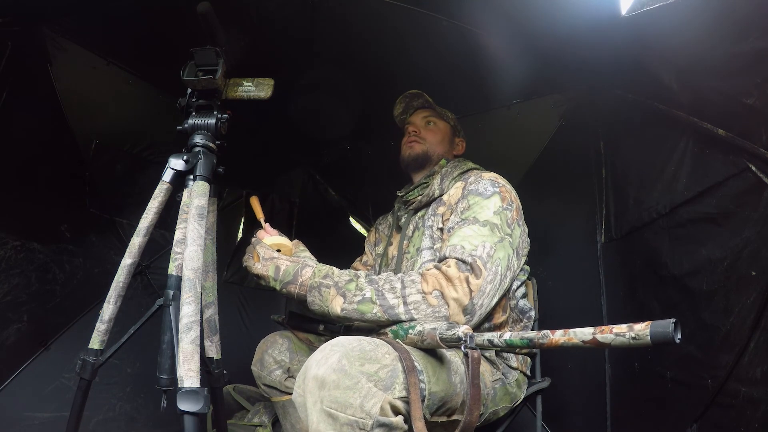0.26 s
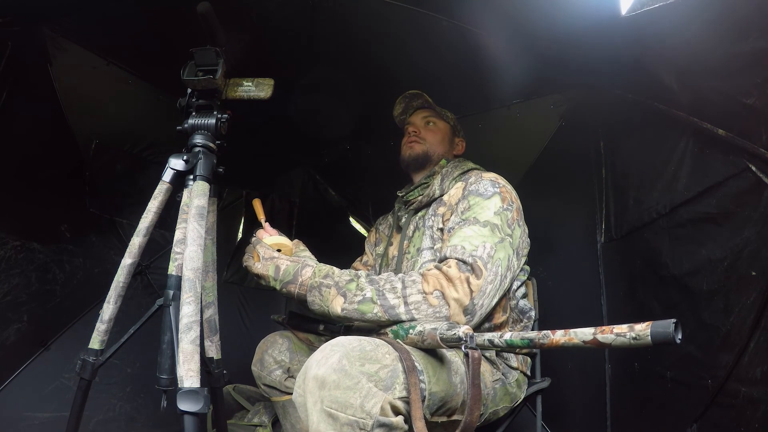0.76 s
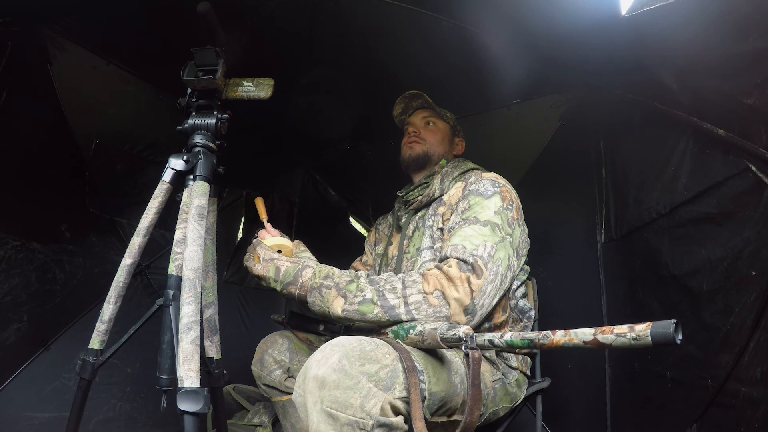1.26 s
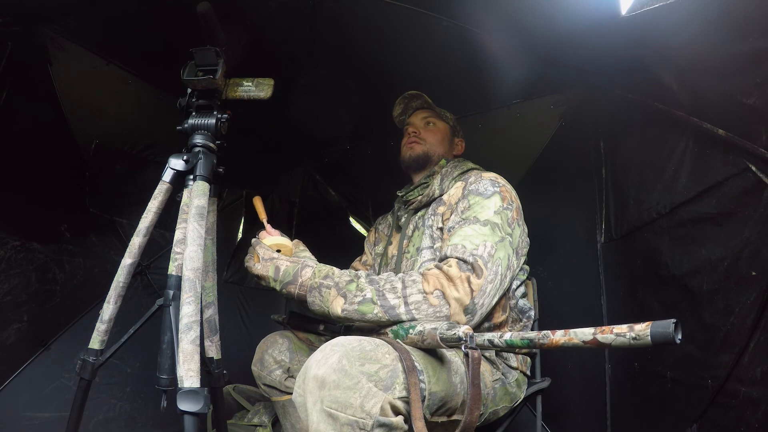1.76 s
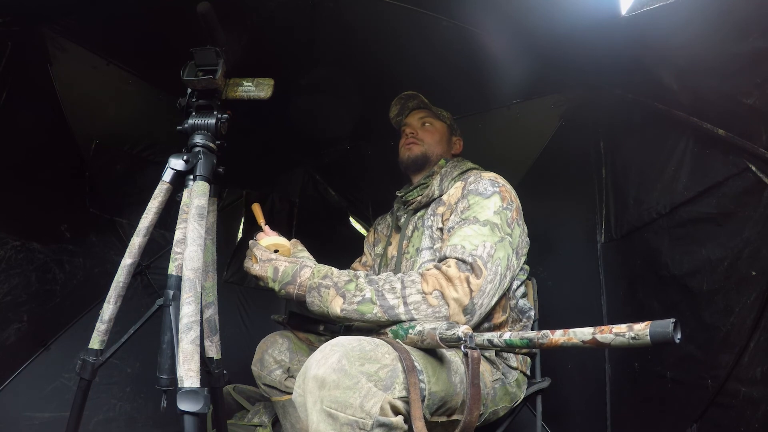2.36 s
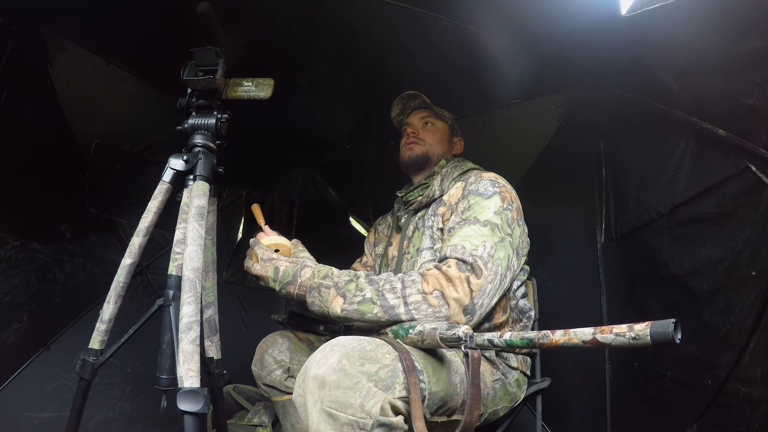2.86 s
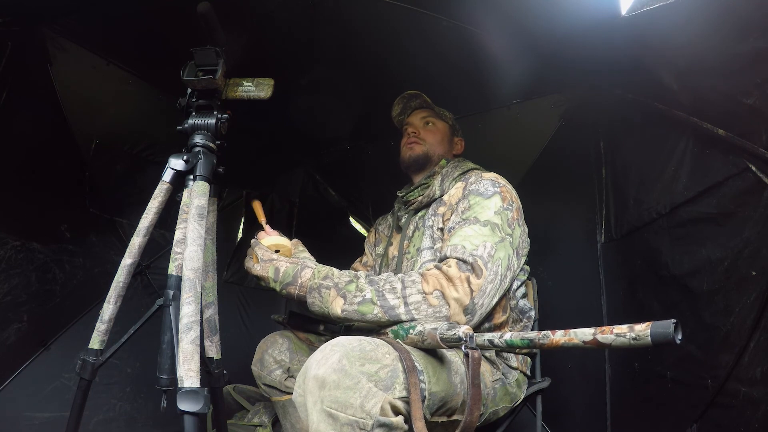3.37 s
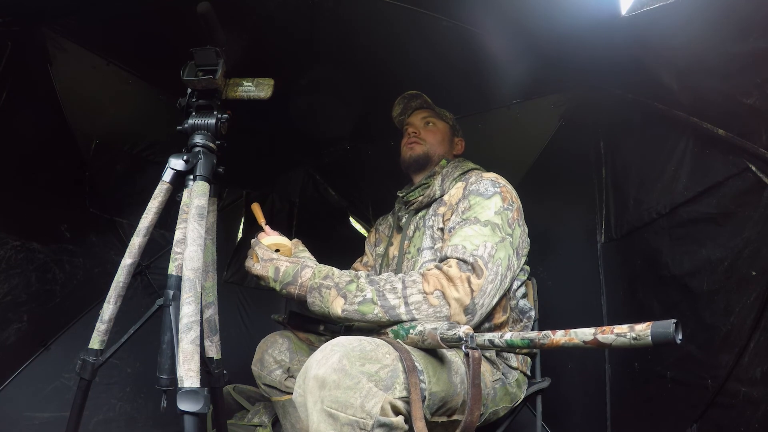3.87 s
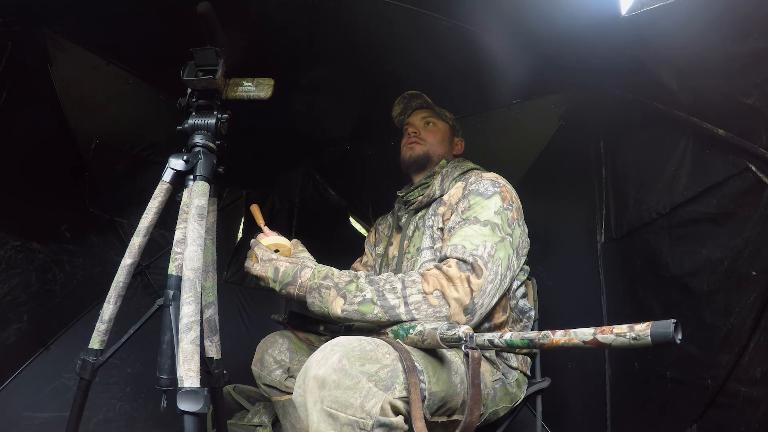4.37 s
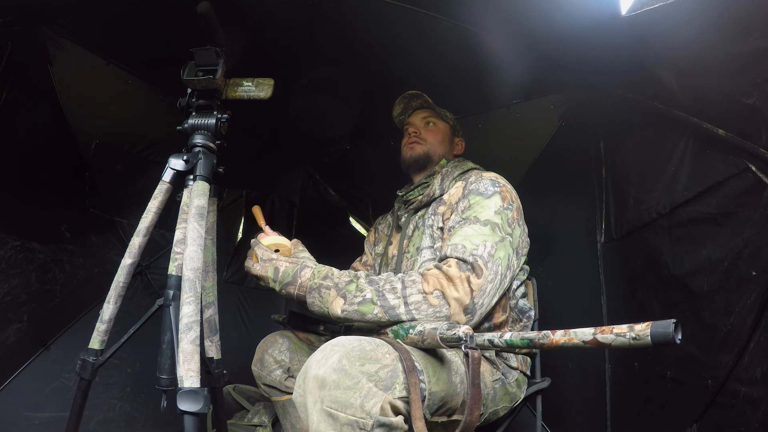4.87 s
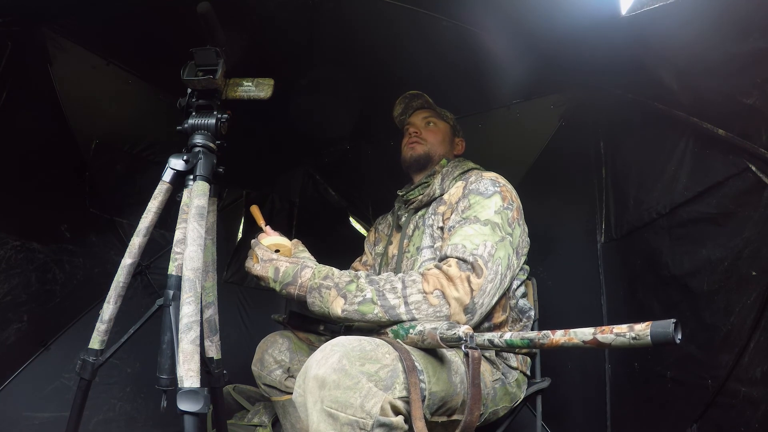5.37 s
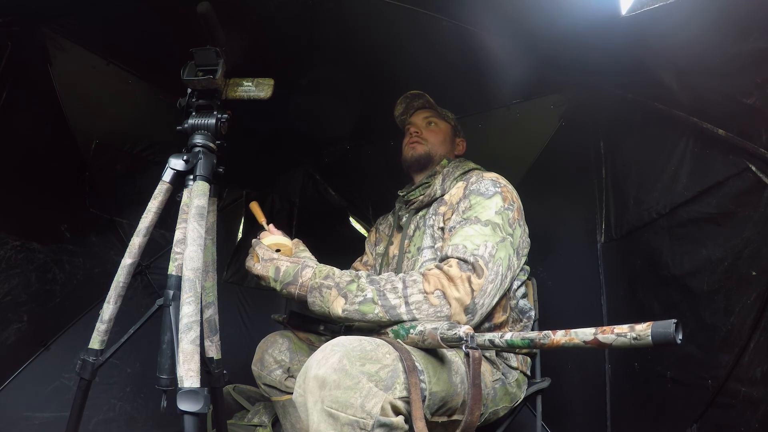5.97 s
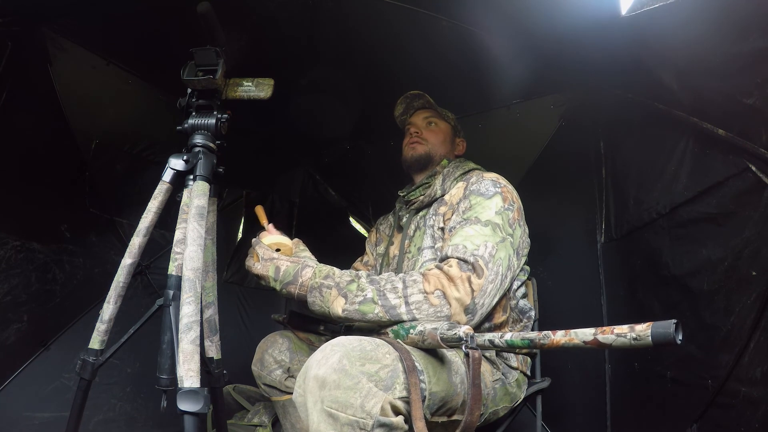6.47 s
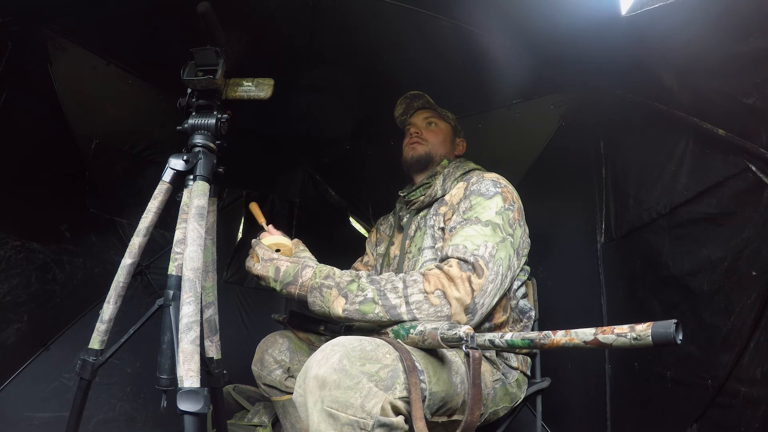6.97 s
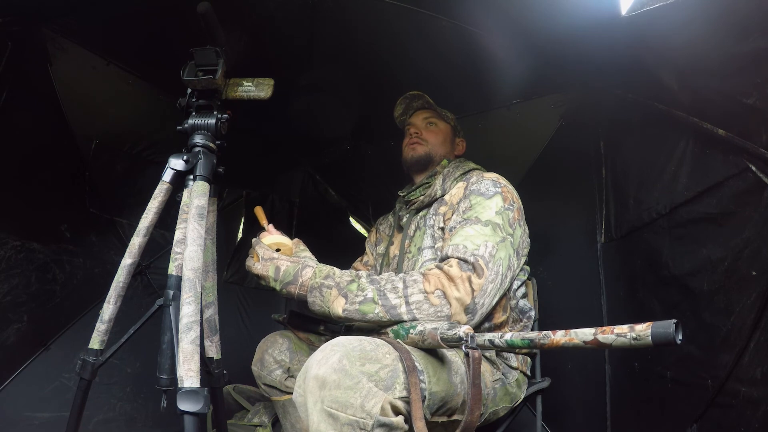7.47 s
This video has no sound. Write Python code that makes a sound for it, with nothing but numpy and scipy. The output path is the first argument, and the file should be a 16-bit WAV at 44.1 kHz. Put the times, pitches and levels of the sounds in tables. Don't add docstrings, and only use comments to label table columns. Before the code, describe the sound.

Hen turkey imitation scratched on slate: irregular hard clucks, a pause, then a steady run of nine cracking yelps over quiet low rumble and hiss.

```python
import sys
import numpy as np
from scipy import signal
from scipy.fft import rfft, irfft, next_fast_len
from scipy.io import wavfile
from scipy.ndimage import uniform_filter1d

SR = 44100
rng = np.random.default_rng(int(sys.argv[2]) if len(sys.argv) > 2 else 0)


def output_pcm(signal):
    pcm = np.clip(np.atleast_2d(signal).T, -1, 1) * 32767
    wavfile.write(sys.argv[1], SR, np.round(pcm).astype(np.int16))


def level_to_linear(level):
    exponent = np.asarray(level, float) / 20
    return 10 ** exponent


N = 340452

# start [t/s], length [t/s], pressure [level/dB], extra sharpness [dB per octave]
CLUCKS = [
    (0.155, 0.044, -11, 0),
    (0.925, .051, -10.5, 0),
    (1.272, 0.046, -10.5, -0.4),
    (1.653, 0.047, -9, -0.66),
    (3.365, .054, -10.5, -0.6),
    (4.536, .042, -15.5, -2.5),
]
# start [t/s], length [t/s], pressure [level/dB], break after start [t/s], pressure after the break [level/dB]
YELPS = [
    (4.848, 0.12, -27.5, 0.081, -17),
    (5.189, 0.11, -16.5, 0.035, -14),
    (5.504, .107, -16, .031, -12.5),
    (5.817, 0.11, -15, 0.05, -11),
    (6.140, 0.11, -11, .061, -13.5),
    (6.434, 0.12, -10.5, 0.064, -11),
    (6.775, .102, -12, .056, -13.5),
    (7.113, 0.11, -11.5, 0.062, -14),
    (7.437, 0.11, -12.5, 0.065, -13.5),
]


def evened(x):
    return x / np.sqrt(np.mean(x ** 2) + 1e-20)


def read(points, hz):
    f, value = np.transpose(points)
    return np.interp(np.log(hz + 1), np.log(f + 1), value)


def add(mix, s, sound):
    part = mix[round(s * SR):][:len(sound)]
    part += sound[:len(part)]


def coloured(x, points):
    n = x.shape[-1]
    size = next_fast_len(n)
    gain = level_to_linear(read(points, np.fft.rfftfreq(size, 1 / SR)))
    return irfft(rfft(x, size) * gain, size)[..., :n]


def air():
    # f/Hz, level/dB (per Hz)
    mid_colour = [(20, -18), (50, -19), (100, -22), (116, -22.5), (128, -6.5), (150, 3), (196, 0.6),
                  (278, -5.5), (500, -12.5), (1060, -16), (1860, -21), (5000, -27.5), (10000, -26.5),
                  (15000, -41.5)]
    # f/Hz, level/dB (per Hz)
    side_colour = [(20, -28.5), (106, -30), (125, -21), (146, 0), (237, -2.5), (278, -5), (572, -6),
                   (1060, -7), (1500, -14), (2070, -18.5), (3530, -32.5), (6500, -26.5), (10000, -29.5),
                   (15000, -37.5)]
    a, b, c, d, patches = rng.standard_normal((5, 513, N // 256 + 5))
    patches = uniform_filter1d(uniform_filter1d(patches, size=10, axis=0), size=16, axis=1)
    noise = np.array([a + 1j * b, c + 1j * d]) * level_to_linear(-0.54 * evened(patches))
    mid, side = signal.istft(noise, nperseg=1024, noverlap=768)[1][:, :N]
    mid = level_to_linear(-52.5) * evened(coloured(mid, mid_colour))
    side = level_to_linear(-49.5) * evened(coloured(side, side_colour))
    return np.array([mid + side, mid - side])


def tail(length, decay_db):
    taps = np.zeros((2, length))
    at = np.arange(100, length - 20, 20)
    at = at + rng.integers(0, 20, (2, len(at)))
    np.put_along_axis(taps, at, rng.choice([-1., 1.], at.shape), 1)
    hz, t, z = signal.stft(taps, SR, nperseg=256)
    out = signal.istft(z * level_to_linear(decay_db(hz[:, None], t)), SR, nperseg=256)[1]
    return out / np.linalg.norm(out[0])


def woods(x):
    # f/Hz, level/dB
    echo_colour = [(700, -48.5), (1000, -9.5), (1250, -3), (1450, -11.5), (1700, -10), (2500, -10.5),
                   (5000, -22.5), (9000, -23.5)]
    ring = [(1250, 1.5), (1500, .8), (2500, .5), (6000, .35)]  # f/Hz, decay by 60 dB t/s
    build_s, build_db = 0.087, 14

    def decay_db(hz, t):
        return -60 * t / read(ring, hz) - build_db * np.clip(1 - t / build_s, 0, 1)

    trees = tail(SR, decay_db)
    paths = trees[:1] + 0.36 * trees
    dull = coloured(x.mean(axis=0), echo_colour)
    echo = signal.fftconvolve(dull[None], paths, axes=1)[:, :N]
    sway = uniform_filter1d(uniform_filter1d(rng.standard_normal(N), size=500), size=500)
    return echo * level_to_linear(2 * evened(sway))


def blind(x):
    # f/Hz, decay by 60 dB t/s
    cloth_decay = [(500, .05), (900, 0.03), (1400, .11), (2500, 0.077), (3500, 0.15), (6000, 0.14),
                   (10000, 0.15)]
    walls = tail(SR // 4, lambda hz, t: -60 * t / read(cloth_decay, hz))
    return signal.fftconvolve(x, walls, axes=1)[:, :N]


def ticks():
    # t/s, peak level/dB
    creaks = [
        (2.335, -48.5),
        (2.4594, -56),
    ]
    out, t = np.zeros((2, N)), np.arange(900) / SR
    bright = signal.butter(2, [5200 / SR * 2, 9500 / SR * 2], "band")
    for s, db in creaks:
        burst = signal.lfilter(*bright, rng.standard_normal(len(t)))
        add(out[0], s, level_to_linear(db) * evened(burst) * np.exp(-t / 0.0072))
    out[1] = 0.64 * out[0]
    return out


def slides():
    # start [t/s], length [t/s], level/dB
    returns = [(0.258, 0.077, -52), (0.303, 0.11, -44.5), (1.022, 0.055, -42), (1.362, 0.11, -46.5),
               (1.775, 0.041, -46.5), (1.986, 0.096, -54), (3.469, 0.079, -43.5), (4.634, 0.11, -48),
               (5.012, 0.11, -48.5), (5.348, 0.092, -41.5), (5.661, 0.1, -39.5), (5.961, 0.14, -39.5),
               (6.306, 0.067, -40.5), (6.611, 0.086, -43), (6.927, 0.13, -45), (7.253, 0.1, -45),
               (7.598, 0.12, -44.5)]
    out = np.zeros(N)
    for s, length, db in returns:
        swell = signal.windows.tukey(round(length * SR), .7)
        add(out, s, level_to_linear(db) * swell * rng.standard_normal(len(swell)))
    return out


def settles():
    # f/Hz, level/dB
    creep_colour = [(700, -37.5), (950, -7.5), (1200, -37), (2200, -13), (2700, -0.5), (3200, -25.5),
                    (6000, -35.5)]
    lead_s, level_db = .045, -42
    swell = np.linspace(0, 1, round(lead_s * SR))
    out = np.zeros(N)
    for start, *_ in CLUCKS + YELPS:
        creep = swell * rng.standard_normal(len(swell))
        add(out, start + 0.0054 - lead_s, level_to_linear(level_db) * creep)
    return coloured(out, creep_colour)


def gesture(start, length, db, break_s, late_db, rates, times, sharp, ease_db, unrest=.02):
    graze_hz, bite_hz, firm_hz, low_hz, lift_hz = rates
    bite_s, drop_s, climb_s = times
    bite_sharp, firm_sharp, loose_sharp, lift_sharp = -2.5, 4.8, -2.12, 0.98
    firming = 55
    full_db, sharp_per_db, rough_per_db = -14, .5, .008
    clean, rough_per_hz, roughest, lift_rough = .02, .0011, .15, .2
    lock_hz, lock_rough = 760, .035
    eased = 0.62

    light, late_light = max(full_db - db, 0), max(full_db - late_db, 0)
    early = unrest + rough_per_db * light
    rough = clean + lock_rough * (low_hz < lock_hz) + rough_per_hz * (firm_hz - low_hz)
    rough = np.clip(rough, 0, roughest)
    bite = bite_sharp + sharp - sharp_per_db * light / 2
    firm = min(bite_sharp + firming * (break_s - bite_s), firm_sharp) - sharp_per_db * light + sharp
    loose = loose_sharp - sharp_per_db * late_light + sharp

    end = start + length
    climb, low = end - climb_s, start + break_s + drop_s
    ease_hz = low_hz + eased * (lift_hz - low_hz)
    return [(start, db - 41, graze_hz, early, -13),
            (start + 0.72 * bite_s, db - 4.5, graze_hz, early, -9.5),
            (start + bite_s, db, bite_hz, early, bite),
            (start + break_s, db, firm_hz, early, firm),
            (low, late_db, low_hz, rough, loose),
            (max(climb, low + .001), late_db, low_hz, rough, loose),
            (climb + eased * climb_s, late_db + ease_db, ease_hz, lift_rough, loose),
            (end, late_db - 25.5, lift_hz, lift_rough, lift_sharp)]


def clucks():
    times = .008, .008, .027
    # grazing, biting, breaking, lowest, lifting off [f/Hz]; overtone 2 of the lowest meets a strong low pot mode
    rates = [872, 872, 872, 612, 1003.5]
    break_s = times[0] + .001
    return [gesture(s, length, db, break_s, db - 1, rates, times, sharp, -5.5, unrest=.2)
            for s, length, db, sharp in CLUCKS]


def yelps():
    # grazing, biting, just before the break, after the break, lifting off [f/Hz]
    slip_rates = [(770, 775, 845, 691, 1010), (800, 740, 722, 719, 960), (830, 765, 704, 712, 1010),
                  (865, 835, 700, 708, 1020), (912, 852, 821, 706, 1050), (915, 875, 812, 793, 930),
                  (910, 860, 805, 625, 1000), (945, 880, 798, 815, 950), (935, 885, 758, 615, 1020)]
    # bite after start [t/s], climb [t/s], extra sharpness [dB per octave]
    hands = [(0.025, .032, -2), (.026, 0.039, -2), (.021, 0.026, -1.1), (.021, 0.027, -0.9),
             (.019, 0.032, -0.06), (.027, .026, 0), (.019, .03, 0), (0.025, 0.03, 0.1), (0.027, .023, -1.3)]
    drop_s, ease_db = .007, -4.5
    return [gesture(*row, rates, (bite_s, drop_s, climb_s), sharp, ease_db)
            for row, rates, (bite_s, climb_s, sharp) in zip(YELPS, slip_rates, hands)]


def stroke(rows):
    s, *columns = np.transpose(rows)
    t = np.arange(s[0], s[-1] + 0.014, 1 / SR)
    smooth = [uniform_filter1d(np.interp(t, s, c), size=90, mode="nearest") for c in columns]
    press_db, hz, rough, slope_db = smooth
    rough = np.clip(rough, 0, 1)
    waver, shake, flutter, grain = rng.standard_normal((4, len(t)))

    waver = evened(uniform_filter1d(waver, size=60))
    turns = np.cumsum(hz * (1 + .09 * rough * waver)) / SR
    shake = evened(uniform_filter1d(uniform_filter1d(shake, size=90), size=90))
    turns += (.01 + .08 * rough) * shake

    slips = np.zeros(len(t))
    for k in range(1, 19):
        slips += level_to_linear(slope_db * np.log2(k / 2)) * np.cos(2 * np.pi * k * turns)
    flutter = evened(uniform_filter1d(uniform_filter1d(flutter, size=200), size=200))
    slips *= level_to_linear(1.2 * flutter)

    burst = 0.68 + np.exp(-(turns % 1) / 0.64)
    grit = level_to_linear(2.0 * slope_db) * evened(burst * np.diff(grain, prepend=0))
    grit_share = .27 + 3.6 * rough
    lift = np.clip((s[-1] - t) / 0.0081 + 1, 0, 1)
    return s[0], level_to_linear(press_db) * lift * (slips + grit_share * grit)


def pot(force):
    # f/Hz, width [Hz], left level/dB, right level/dB, left phase [rad], right
    call_modes = [(706, 296, -29, -23.5, 2.77, 2.94), (954, 96, -9.5, -10.5, 2.855, 1.6),
                  (1268, 40, -0.5, -0.5, 0.16, 2.6), (1486, 81.6, -15, -0.54, 4.24, 4.86),
                  (1622.5, 38.7, 1.2, -1.5, 4.84, 3.4), (1759, 142, -4.5, -6, 5.52, 5.31),
                  (2008, 1107, -9, -11, 1.453, 0.82), (2148, 285, -11.5, -22.5, 2.77, 2.19),
                  (2536, 88, 0, -9, 5.6, 5.8), (2655, 405, -1.5, -5.5, 4.013, 4.11),
                  (2730, 44, -6, -16.5, 0.17, 2.8), (3050, 346, -6.5, -14, 6.06, 6.06),
                  (3602, 61, -22.5, -18, 1.7, 3.7), (4290, 87, -28, -20.5, 1.1, 2.17),
                   (5470, 43, -31.5, -34.5, 3, 12), (5113, 117, -10, -11, 4.35, 4.41),
                   (5730, 330, -20, -15.5, 3.67, 1.58), (6160, 630, -23.5, -20.5, 3.94, 4.03),
                   (6190, 58, -23.5, -16.5, 4.9, 5.16), (7020, 170, -23, -16, 1.7, 1.3),
                   (7430, 275, -24.5, -23, 5.5, .4), (8010, 1800, -53, -32.5, 3, 4.67),
                   (8940, 150, -45.5, -29, 1.6, 5.26)]
    t = np.arange(4096) / SR
    ring = np.zeros((2, len(t)))
    for hz, width, left_db, right_db, *phase in call_modes:
        shape = np.cos(2 * np.pi * hz * t + np.c_[phase]) * np.exp(-np.pi * width * t)
        ring += level_to_linear(np.c_[[left_db, right_db]]) * shape * 2 * np.pi * width / SR
    return level_to_linear(6.5) * signal.oaconvolve(force[None], ring, axes=1)[:, :N]


def pot_call():
    # f/Hz, level/dB
    slide_colour = [(500, -27), (1300, -0.5), (2500, -6), (4000, 6), (5100, 4.5), (6300, 2.5), (7200, -8.5),
                    (9000, 10.5), (12000, -3.5)]
    # f/Hz, level/dB
    hiss_colour = [(1500, -54), (3000, -38.5), (4500, -40), (5500, -24.5), (7000, -25.5), (8500, -38),
                   (12000, -53.5)]
    # f/Hz, level/dB
    tip_colour = [(8800, -0.18), (9800, -6.5), (10800, -25.5), (12000, -11), (13200, -13), (15000, -29)]
    grit = slides()
    force = coloured(grit, slide_colour) + settles()
    for rows in clucks() + yelps():
        add(force, *stroke(rows))
    hiss = coloured(grit, hiss_colour) * level_to_linear([[22], [23]])
    return pot(coloured(force, tip_colour)) + hiss


def scene():
    call = pot_call()
    echoes = level_to_linear(-3.5) * blind(call) + level_to_linear(-33.0) * woods(call)
    return call + echoes + ticks() + air()


def top_cut(x):
    return signal.sosfilt(signal.butter(12, 15130, fs=SR, output="sos"), x)


def record(dry):
    power = uniform_filter1d((dry ** 2).mean(axis=0), size=4000)
    power_db = 10 * np.log10(abs(power) + 1e-12)
    fall = np.arange(N) * 9.6 / SR
    held_db = np.maximum.accumulate(power_db + fall) - fall
    over_db = np.maximum(held_db + 18.5, 0)
    mix = dry / level_to_linear(0.51 * uniform_filter1d(over_db, size=2000))
    return top_cut(mix)


dry = scene()
out = record(dry)
output_pcm(out)
```